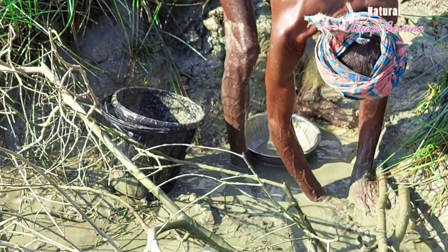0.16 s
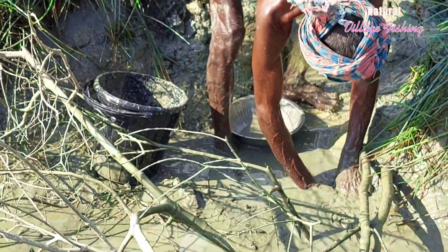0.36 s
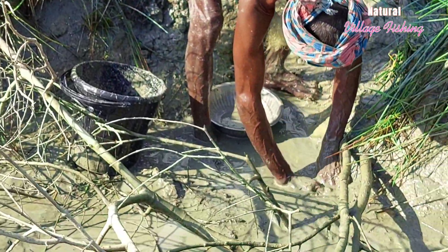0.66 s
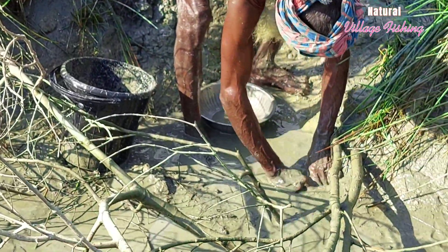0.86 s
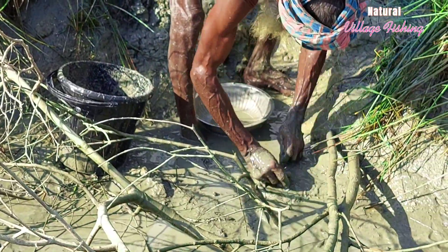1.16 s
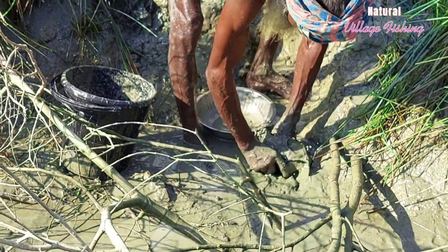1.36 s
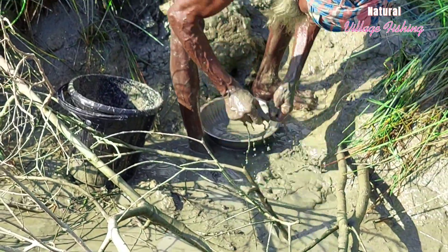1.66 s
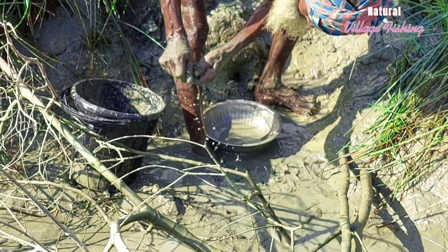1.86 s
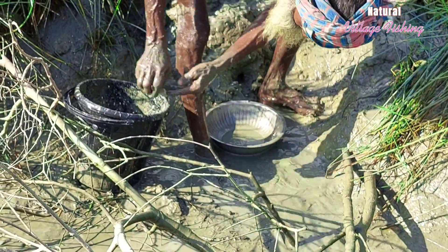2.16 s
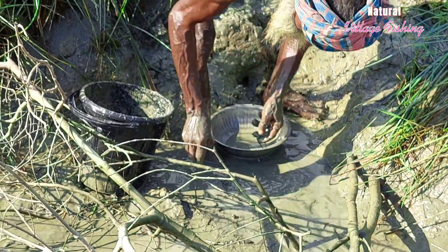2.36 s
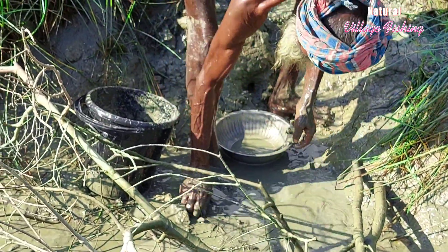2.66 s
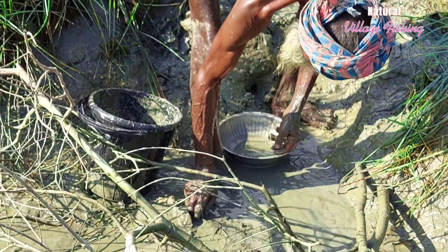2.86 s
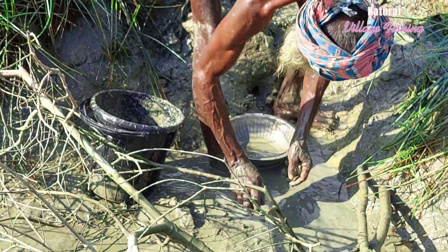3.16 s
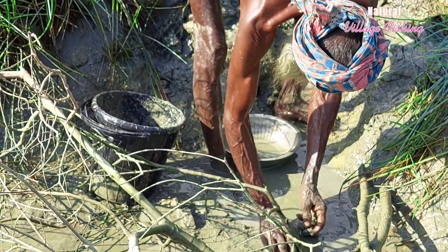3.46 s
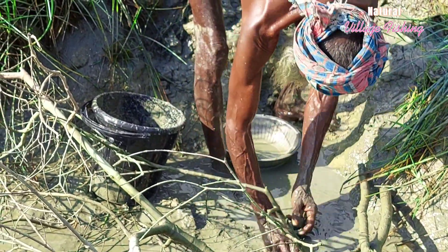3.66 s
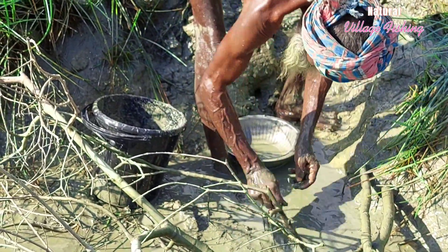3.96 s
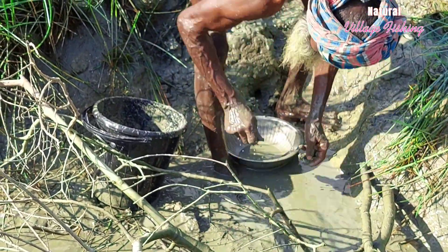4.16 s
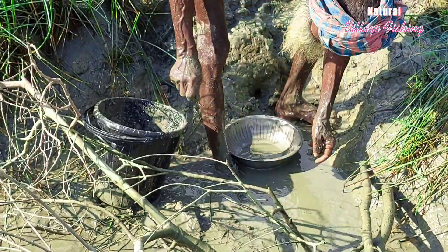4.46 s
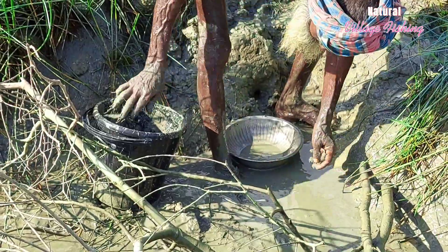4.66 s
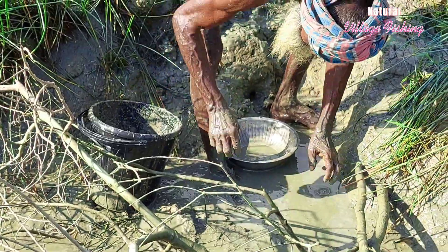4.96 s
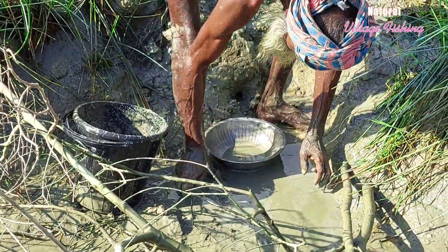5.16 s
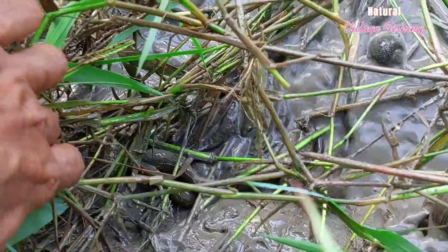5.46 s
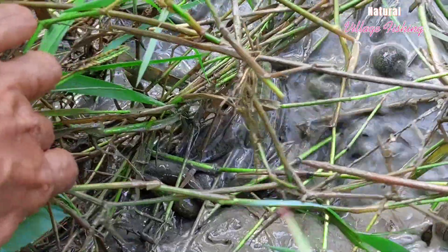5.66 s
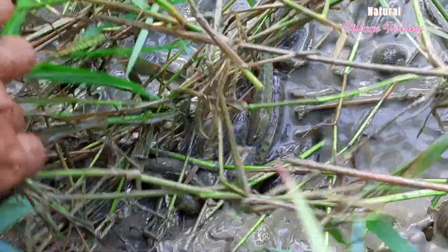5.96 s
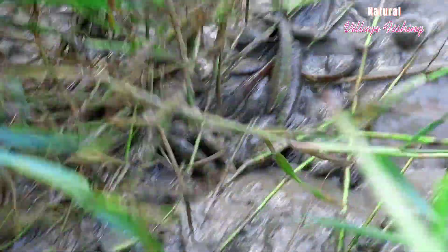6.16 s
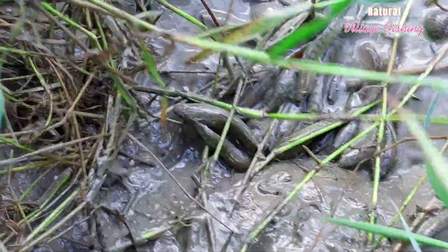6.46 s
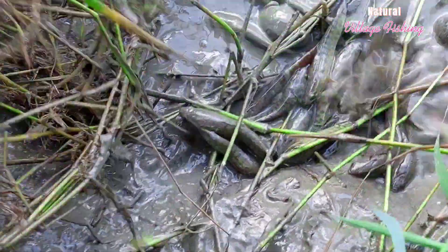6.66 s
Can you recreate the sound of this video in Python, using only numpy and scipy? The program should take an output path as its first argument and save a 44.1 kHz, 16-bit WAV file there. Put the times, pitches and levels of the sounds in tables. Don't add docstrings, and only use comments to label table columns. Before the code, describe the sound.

Outdoors in a muddy field, a one-cylinder pump engine chugs about sixteen beats a second with a rattling casing. Close by, hands squelch in mud, popping small bubbles, while dry stalks snap. A fly buzzes past, the microphone is knocked on its right side, and a small bird chirps. Near the end the scene cuts: the engine turns farther and duller, and grass rustles loudly as it is pushed aside.

```python
import sys
import numpy as np
from scipy import signal
from scipy.fft import rfft, irfft, next_fast_len
from scipy.io import wavfile
from scipy.ndimage import uniform_filter1d, map_coordinates

SR = 44100
rng = np.random.default_rng(int(sys.argv[2]) if len(sys.argv) > 2 else 0)


def natural_amplitude(level_db):
    exponent = np.asarray(level_db, float) / 20
    return 10 ** exponent


def dump_mix(stems):
    frames = np.atleast_2d(stems).T
    limited = np.clip(frames, -1, 1)
    pcm = np.round(limited * 32767).astype(np.int16)
    wavfile.write(sys.argv[1], SR, pcm)


N = 299439
T = np.arange(N) / SR
CHANGE_S = 5.7395
AFTER = T >= CHANGE_S
LEFT_DB, RIGHT_DB = 9, -5
ENGINE_SIDES = natural_amplitude([[-1.2], [1.2]])

# time_s, firings_counted
TURNS = [(0.0076, 0), (0.6559, 10), (1.301, 20), (1.9412, 30), (2.324, 36), (2.5781, 40), (2.8927, 45),
         (3.2717, 51), (3.8427, 60), (4.602, 72), (5.2306, 82), (5.7365, 90)]
# time_s, firings_counted
TURNS_AFTER = [(5.7882, 0), (6.7421, 15)]
# time_s, bark_db, bright_casing_db
IN_VIEW = [(0, .8, -2), (.7, .3, -2), (1.35, 1.2, .3), (2, .8, .3), (2.45, -.6, .3), (2.85, 1.5, -2),
           (3.25, .3, -3), (3.6, 2, -4), (4, 2, -11), (4.3, .3, -11), (4.9, -1, -8), (5.7, .3, -5)]
# start_s, length_s, level_db, large_pocket_share (0-1)
SPLASHES = [(0.089, 0.085, -55, .1), (1.342, 0.13, -43.5, .1), (1.415, .17, -45, .35),
            (1.55, 0.17, -47, .05), (2.151, 0.2, -53, .1), (2.79, .07, -58, .6), (5.075, .05, -45, .5),
            (6.055, .07, -50, .1), (6.225, 0.15, -49, .05), (6.36, .12, -52, .1), (6.46, 0.36, -56, .19)]
# frequency_hz, density_db_per_hz
RUSTLE = [(2650, -21), (4500, -2.5), (5420, -1.5), (5900, -9), (7530, -2.5), (8600, -4.5), (11100, 3),
          (13600, 2.5), (15000, 0), (16000, -7)]


def unit(x):
    return x / np.sqrt(np.mean(x ** 2) + 1e-20)


def curves(rows, t=T):
    s, *cols = np.transpose(rows)
    return [np.interp(t, s, c) for c in cols]


def wobble(rate):
    coarse = T[::16]
    knots = rng.standard_normal(int(N * rate / SR) + 4)
    return np.interp(T, coarse, map_coordinates(knots, [coarse * rate]))


def coloured(x, points):
    m = next_fast_len(x.shape[-1] + 8192)
    f, db = np.transpose(points)
    gain = natural_amplitude(np.interp(np.log(np.fft.rfftfreq(m, 1 / SR) + 1), np.log(f), db, -120, -120))
    return irfft(rfft(x, m) * gain, m)[..., :x.shape[-1]]


def noise(points, alike, grain_db=0, grain_rate=300):
    a, b = rng.standard_normal((2, N))
    turn = np.arccos(np.clip(alike, -1, 1)) / 2
    middle, side = np.cos(turn) * a, np.sin(turn) * b
    pair = np.array([middle + side, middle - side])
    return unit(coloured(pair * natural_amplitude(grain_db * wobble(grain_rate)), points))


def patchy(pair, patchy_db):
    z = signal.stft(pair, nperseg=256)[2]
    patches = uniform_filter1d(rng.standard_normal(z.shape[1:]), size=7, axis=0)
    patches = uniform_filter1d(patches, size=8, axis=1)
    return unit(signal.istft(z * natural_amplitude(patchy_db * unit(patches)), nperseg=256)[1][:, :N])


def humps(rows, skew):
    out = np.zeros(N)
    for s, length, db, *_ in rows:
        span = slice(round(s * SR), round((s + length) * SR))
        out[span] += natural_amplitude(db) * np.sin(np.pi * np.clip((T[span] - s) / length, 0, 1) ** skew)
    return out


def sided(pan_db):
    left = natural_amplitude(pan_db) / (1 + natural_amplitude(pan_db))
    return 2 * np.array([left, 1 - left]).reshape(2, -1)


def add(out, x, s, pan_db, lag=0):
    for side, shift, db in zip(out, (0, lag), (pan_db / 2, -pan_db / 2)):
        spot = side[max(round(s * SR) + shift, 0):][:x.shape[-1]]
        spot += natural_amplitude(db) * x[:len(spot)]


def counted(turns):
    s, count = np.transpose(turns)
    beyond_s = np.minimum(T - s[0], 0) + np.maximum(T - s[-1], 0)
    return np.interp(T, s, count) + beyond_s / .064


def firing_count():
    return np.where(AFTER, 100 + counted(TURNS_AFTER), counted(TURNS))


def chirps():
    # start_s, length_s, first_hz, last_hz, level_db
    calls = [
        (.585, .05, 4100, 3900, -54),
        (.595, .07, 2500, 2450, -50),
        (1.04, .08, 4200, 4500, -59),
        (2.465, .05, 3900, 4200, -57),
        (5.655, .085, 2650, 2400, -47),
        (5.735, .048, 4650, 4600, -52),
        (3.83, .05, 3950, 3600, -56),
        (4.855, .085, 2250, 2100, -56),
        (5.86, .16, 2750, 4500, -59),
    ]
    out = np.zeros((2, N))
    for s, length, first_hz, last_hz, db in calls:
        hz = np.linspace(first_hz, last_hz, round(length * SR))
        husk = 1 + 5.5 * uniform_filter1d(rng.standard_normal(len(hz)), size=70)
        tone = husk * np.sin(2 * np.pi * np.cumsum(hz) / SR)
        add(out, natural_amplitude(db - 1.5) * signal.windows.tukey(len(hz), .6) * tone, s, -6)
    return out


def bird():
    roll_s, roll_gap_s, roll_hz, roll_db = 4.856, .0172, (7600, 4100), -50
    arch_s, arch_gap_s, low_hz, high_hz, arch_db = 4.975, .038, 2500, 3800, -42
    out = np.zeros((2, N))
    slur, u = np.linspace(*roll_hz, 230), np.linspace(0, 1, 1500)
    arch = low_hz + (high_hz - low_hz) * np.sin(np.pi * u ** .7)
    arch_shape = (arch / high_hz) ** 9 * u ** .7
    notes = [(roll_s + k * roll_gap_s, slur, roll_db, np.hanning(len(slur)), LEFT_DB) for k in range(5)]
    notes += [(arch_s + k * arch_gap_s, arch, arch_db - k, arch_shape, -2) for k in range(3)]
    for s, hz, db, shape, pan_db in notes:
        turns = 2 * np.pi * np.cumsum(hz) / SR
        husk = 1 + .9 * uniform_filter1d(rng.standard_normal(len(hz)), size=12)
        add(out, natural_amplitude(db) * shape * husk * (np.sin(turns) + .1 * np.sin(2 * turns)), s, pan_db)
    return out


def fly():
    # time_s, band_hz, level_db
    passes = [
        [(3.26, 4650, -64), (3.3, 4550, -62), (3.345, 4750, -60)],
        [(3.37, 4250, -57), (3.41, 4800, -54), (3.435, 5600, -59), (3.475, 5850, -60), (3.54, 5550, -64),
         (3.6, 4900, -69), (3.65, 4400, -56), (3.705, 4550, -58)],
        [(3.57, 3370, -63), (3.69, 4000, -62)],
        [(3.87, 1850, -57), (3.925, 2200, -50), (3.97, 2400, -55)],
        [(4.085, 2450, -54), (4.14, 2500, -51), (4.19, 2550, -53), (4.225, 3200, -52), (4.27, 3500, -50),
         (4.33, 3600, -49), (4.41, 3500, -52), (4.48, 3700, -50), (4.57, 3750, -49)],
        [(4.42, 4050, -55), (4.46, 4350, -50), (4.57, 4650, -47)],
        [(4.37, 5750, -65), (4.43, 6650, -63), (4.5, 7300, -63), (4.57, 7600, -64)],
        [(4.39, 7500, -66), (4.48, 8200, -65), (4.57, 8500, -66)],
        [(4.385, 11300, -61), (4.46, 11700, -57), (4.57, 12200, -57)],
        [(4.72, 3300, -62), (4.82, 3650, -58), (4.97, 3550, -58)],
        [(5.18, 3800, -55), (5.38, 4400, -52)],
        [(5.41, 3700, -54), (5.46, 3950, -48), (5.52, 4480, -42.5), (5.59, 4650, -49), (5.62, 4100, -58),
         (5.68, 3900, -61)],
        [(5.51, 4600, -50), (5.56, 5200, -50), (5.6, 4900, -57)],
    ]
    # time_s, left_right_db, wing_beat_hz, air_share
    place = [(3.3, 5, 168, 1.3), (3.5, 17, 170, 1.3), (3.68, 0, 172, 1.5), (3.9, -8, 178, 1.8),
             (4.17, 2, 172, 1.6), (4.25, 8, 166, .5), (4.37, 6, 166, .5), (4.47, -1, 182, .8),
             (4.6, 1, 182, .8), (4.8, 5, 163, 1.2), (5.5, -8, 163, 1.2)]
    out = np.zeros((2, N))
    pan_db, beat_hz, airy = curves(place)
    rate = beat_hz * (1 + 0.008 * wobble(6))
    beats = np.cumsum(rate * (1 + 0.012 * wobble(90))) / SR
    flit_db = 2.4 * wobble(28)
    for rows in passes:
        span = slice(round(rows[0][0] * SR), round(rows[-1][0] * SR))
        hz, db = curves(rows, T[span])
        since = beats[span] % 1 / rate[span]
        stroke = since / .0012 * np.exp(-since / .0012)
        tone = 0
        for ratio, gain_db in [(1, 0), (1.68, -22), (1.95, -23)]:
            loss_db = np.maximum(ratio * hz - 6900, 0) / 90 * (ratio > 1)
            tone = tone + natural_amplitude(gain_db - loss_db) * np.sin(2 * np.pi * ratio * hz * since)
        narrow, wide = [unit(uniform_filter1d(rng.standard_normal(len(hz)), size=size)) for size in (110, 26)]
        air = (narrow + .7 * wide) * np.sin(2 * np.pi * np.cumsum(hz) / SR)
        buzz = unit(unit(stroke * tone) + airy[span] * air)
        add(out, natural_amplitude(db + flit_db[span]) * signal.windows.tukey(len(hz), .2) * buzz, rows[0][0], 0)
    return out * sided(pan_db)


def knocks():
    # start_s, peak_db, low_ring_db, left_loss_db
    bumps = [
        (2.819, -30.5, 9, 13.5),
        (4.056, -12, 3.5, 15),
        (5.0657, -24.5, -20, 12.5),
        (5.0755, -27, -12, 9.5),
        (5.0865, -35, -13, 18),
        (5.132, -38, -13, 12),
        (5.698, -40, 9, 14.5),
    ]
    # start_s, peak_db, low_ring_db, left_loss_db
    rebounds = [(4.0617, -19, -10, 15)]
    # frequency_hz, level_db, t60_s
    modes = [(85.3, -8.5, 0.07), (157.2, -9.5, .07), (320.6, 3, 0.022), (513, -1, 0.013), (740, -4, .01),
             (980, -7, 0.009), (1400, -12, .005), (2700, -7, 0.004)]
    hard_s, soft_s = .00013, .0012
    out, t = np.zeros((2, N)), np.arange(SR // 5) / SR
    contacts = [(*row, hard_s) for row in bumps] + [(*row, soft_s) for row in rebounds]
    for s, db, low_db, loss_db, build_s in contacts:
        ring = 0
        for hz, level, t60 in modes:
            decay = natural_amplitude(level + low_db * (hz < 300) - 60 * t / t60)
            ring = ring + np.sign(300 - hz) * decay * np.sin(2 * np.pi * hz * t)
        add(out, natural_amplitude(db) * (1 - np.exp(-t / build_s)) * ring, s + 0.00038, -2 * loss_db)
    return out * natural_amplitude(-3)


def field():
    # frequency_hz, density_db_per_hz
    slosh_bands = [(450, -36), (750, 2), (1000, -2), (1300, -1), (1800, -8), (2500, -68)]
    stir_bands = [(1200, -38), (1700, -3), (2250, 0), (3000, -6.5), (4400, -5.5), (5500, -16), (8000, -33)]
    # time_s, effort_db
    effort_rows = [(0, -55), (.4, -68), (.83, -66.5), (1.25, -63.5), (1.4, -55), (1.68, -57.5), (2.15, -60),
                   (2.42, -68.5), (2.72, -65), (2.87, -74), (3.54, -75), (4.25, -72), (4.58, -63),
                   (4.85, -66), (5.31, -58), (6.05, -58.5), (6.54, -40.5), (6.79, -39)]
    # start_s, length_s, level_db
    swishes = [(0.69, 0.11, -52.5), (0.903, 0.1, -67), (1.354, 0.08, -56), (1.837, 0.044, -49),
               (1.928, 0.12, -49), (2.233, .1, -54), (3.138, 0.05, -63), (3.2, 0.07, -59),
               (4.36, 0.25, -60), (5.09, .09, -46), (5.269, 0.085, -47), (5.408, 0.074, -48),
               (6.05, 0.045, -55)]
    # start_s, length_s, level_db
    trickle = [(1.5, 4.2, -68)]
    effort, splash = natural_amplitude(curves(effort_rows)[0]), humps(SPLASHES, skew=.8)
    large_splash = humps([row for row in SPLASHES if row[-1] > .2], skew=.8)

    water = natural_amplitude(np.where(AFTER, -77, -65.5)) + natural_amplitude(-10) * large_splash + natural_amplitude(-21.5) * effort
    water = water + humps(trickle, skew=1.1)
    mud = natural_amplitude(np.where(AFTER, -68, -63.5)) + natural_amplitude(-7) * splash + natural_amplitude(-9) * effort
    slosh = water * natural_amplitude(4.5 + 3.3 * wobble(11)) * noise(slosh_bands, alike=0.039, grain_db=1.5, grain_rate=60)
    stirred = patchy(noise(stir_bands, alike=0.021, grain_db=2.2, grain_rate=130), patchy_db=2.5)
    stir = mud * natural_amplitude(4 + 2.1 * wobble(14)) * stirred

    strokes = humps(swishes, skew=1.04) * natural_amplitude(3 * wobble(70))
    brushed = effort * natural_amplitude(np.where(AFTER, .8, 2.2) * wobble(22)) + .8 * strokes
    blades = noise(RUSTLE, alike=0.059, grain_db=np.where(AFTER, 1.2, 2.8), grain_rate=200)
    rustle = natural_amplitude(5) * brushed * patchy(blades, patchy_db=2.5)
    wet_bands = [(1500, -35), (2200, 3), (4500, 4), (6000, -4), (7500, -40)]
    wet = natural_amplitude(4) * strokes * noise(wet_bands, alike=.05, grain_db=3.5, grain_rate=120)
    on_left = (T > 2.9) & (T < 5.04)
    return slosh + (stir + wet) * sided(RIGHT_DB) + rustle * sided(np.where(on_left, LEFT_DB, RIGHT_DB))


def bubbles():
    small_hz, large_hz, spread, life_cycles = 2150, 1000, 1.75, 2.1
    out, t = np.zeros((2, N)), np.arange(SR // 80) / SR
    for s, length, db, large in SPLASHES:
        for when, kind, pitch, size, side in rng.random((90, 5)):
            hz = (small_hz if kind > large else large_hz) * spread ** (pitch - .5)
            ring = np.sin(2 * np.pi * hz * (t + 4 * t * t)) * t * hz * np.exp(-t * hz / life_cycles)
            pan_db, lag = -6 + 8 * (side - .5), round(30 * side) - 8
            add(out, natural_amplitude(db + 3.5 - 13 * size) * ring, s + when * length, pan_db, lag=lag)
    return out


def pops():
    # start_s, peak_db, pitch_hz, left_right_db
    pockets = [(0.107, -30.5, 2220, -12), (0.126, -25, 1296, -11), (0.127, -34, 1950, -11),
               (0.155, -37.5, 2230, -23), (0.204, -27, 3620, -7), (0.482, -42.5, 2320, -19),
               (1.344, -31, 3720, -11), (1.471, -30.5, 985, 2), (1.485, -32, 2170, -17.5),
               (1.512, -31, 2130, -17), (1.552, -34, 1090, -5), (1.623, -29, 2190, -9.5),
               (1.776, -40, 780, 2), (1.784, -44, 4150, -13), (2.276, -26, 2386, -5),
               (3.153, -27.5, 2745, -4), (3.765, -36, 4250, -14), (3.977, -45.5, 2540, -27),
               (4.566, -21, 2383, -3.5), (4.914, -31, 900, 0), (4.914, -39, 1450, 0),
               (4.915, -41, 2200, -4), (4.963, -36, 2080, -19), (5.099, -30, 4240, -13),
               (5.159, -31, 4360, -4), (5.283, -33, 3840, -12), (5.315, -34, 3790, -8),
               (6.061, -29, 2354, -4.5), (6.256, -37, 2300, -9.5), (6.38, -38, 2540, -18.5),
               (6.485, -30, 2084, -19), (6.649, -33, 1900, -9), (6.73, -33.5, 1004, 1)]
    # start_s, peak_db, pitch_hz
    gurgles = [(.036, -41, 4600), (.056, -42, 3500), (.066, -40, 1250), (.136, -39, 3500),
               (.275, -44, 2300), (1.358, -38, 3000), (1.374, -34, 2270), (1.383, -39, 1100),
               (1.394, -36, 2350), (1.404, -38, 1200), (1.421, -32, 2300), (1.437, -34, 1050),
               (1.443, -37, 2150), (1.454, -38, 1050), (1.514, -35, 1000), (1.524, -36, 850),
               (1.532, -38, 1250), (1.552, -38, 4000), (1.566, -39, 1150), (1.652, -37, 2100),
               (1.666, -36, 3100), (1.672, -37, 2200), (1.728, -43, 1230), (1.788, -41, 1200),
               (1.811, -41, 1680), (2.62, -47, 5300), (2.7, -45, 3700), (3.145, -39, 2100),
               (3.335, -50, 4800), (3.71, -46, 1550), (3.832, -47, 4000), (4.666, -39, 3040),
               (4.709, -46, 4750), (4.831, -43, 900), (4.958, -44, 3600), (4.966, -41, 4250),
               (4.967, -41, 3050), (4.979, -44, 1250), (5.11, -40, 2300), (5.606, -42, 2160),
               (5.724, -39, 3400), (5.73, -39, 1850), (5.775, -46, 5200), (5.81, -48, 5000),
               (5.835, -45, 2850), (5.851, -46, 1750), (5.862, -46, 2000), (5.953, -48, 2100),
               (5.962, -46, 4150), (5.998, -48, 2370), (6.03, -45, 650), (6.056, -44, 1250),
               (6.075, -43, 1750), (6.092, -45, 2400), (6.171, -45, 2480), (6.256, -42, 3650),
               (6.275, -42, 1400), (6.284, -41, 2310), (6.31, -39, 3100), (6.325, -43, 1750),
               (6.422, -43, 2210), (6.447, -41, 2340), (6.745, -42, 900), (6.777, -37, 2600)]
    t60_s, quick_hz = .029, 2500
    out, t = np.zeros((2, N)), np.arange(SR // 20) / SR
    for s, db, hz, pan_db in pockets + [(*row, -6) for row in gurgles]:
        spray = uniform_filter1d(uniform_filter1d(rng.standard_normal(len(t)), size=24), size=14)
        ring = np.sin(2 * np.pi * hz * (t + 3 * t * t)) * (1 + 2.4 * spray)
        decay = natural_amplitude(db + 4.5 - 60 * t / t60_s * max(hz / quick_hz, 1) ** 1.4)
        add(out, decay * (1 - np.exp(-t * hz / .7)) * ring, s, pan_db, lag=9)
    return out


def snaps():
    # start_s, peak_db
    stalks = [(0.702, -28), (1.1812, -43.5), (1.5, -32), (1.6105, -21), (1.63, -12), (1.637, -34),
              (1.648, -36), (1.66, -38), (1.8355, -24), (1.8415, -12), (1.864, -35), (2.2095, -34),
              (2.3888, -26), (2.41, -33), (2.66, -46), (2.733, -42), (5.1342, -22), (5.1598, -14.5),
              (5.284, -24), (5.299, -28), (5.316, -27), (5.331, -26), (5.3921, -38), (5.4306, -30),
              (5.436, -15), (5.5118, -29)]
    # start_s, peak_db, body_db
    twigs = [(0.2034, -29, 11.5), (0.6876, -42, 1), (1.235, -37, 2), (1.2515, -36, -1), (1.3275, -36, -7),
             (1.3443, -32, 12), (1.4805, -38, -6), (1.5913, -36, -4), (1.7974, -41, 0), (1.842, -30, 4),
             (1.9589, -30, 0), (2.2448, -38, -5), (2.046, -40, 0), (2.132, -41, 2), (2.2573, -32, 5),
             (2.2787, -37, 5), (2.307, -36, -3), (2.8127, -44, 9), (5.0983, -34, 9), (5.16, -28, 4),
             (5.1921, -33.5, -4), (5.286, -34, 6), (5.336, -31, 5), (5.438, -31, 5), (5.2594, -42, -6),
             (6.0596, -24, -7), (6.483, -31, 4)]
    # start_s, peak_db, body_db
    brush = [(0.1055, -36.5, 0), (3.0339, -50, -10), (3.1512, -46.5, -3), (3.2121, -46, -8),
             (3.761, -49, -3), (4.026, -46, -7), (4.0553, -32, 9), (4.3633, -43, -8), (4.499, -42, -14),
             (4.523, -41, -14), (4.543, -40, -14), (4.609, -45, -14), (4.65, -44, -8), (4.666, -40, 0),
             (4.709, -44, -6), (4.5657, -21.5, -6), (4.6365, -45, 2), (4.6962, -44, 0), (4.739, -40, -12),
             (4.786, -41, -14)]
    edge, body, t = np.zeros((2, N)), np.zeros((2, N)), np.arange(SR // 10) / SR
    rows = [(s, db, -21, -8) for s, db in stalks]
    rows += [(*row, -7) for row in twigs]
    rows += [(*row, 10) for row in brush]
    for s, db, body_db, pan_db in rows:
        t60_s = .026 - .0004 * (db + 35)
        burst = natural_amplitude(db - 60 * t / max(t60_s, .003)) * (1 - np.exp(-t / 0.0014)) * rng.standard_normal(len(t))
        spurts = np.repeat(rng.standard_normal(len(t) // 30 + 1), 30)[:len(t)]
        burst *= natural_amplitude(3.6 * spurts)
        lag = round(-pan_db * rng.uniform(-1, 3.5))
        add(edge, burst, s, pan_db, lag=lag)
        add(body, natural_amplitude(body_db) * burst, s, pan_db, lag=lag)
    edge_bands = [(hz, 0.89 * db - 5 * (hz < 8000)) for hz, db in RUSTLE]
    bright = coloured(patchy(edge, patchy_db=2.2) * np.sqrt(np.mean(edge ** 2)), edge_bands)
    dull = coloured(body, [(900, -37), (1900, 2), (4800, -1), (6000, -5), (7500, -40)])
    return natural_amplitude(3) * bright + natural_amplitude(2.5) * dull


def hum():
    # multiple, level_db
    frame_lines = [(6, -49.5), (7, -53)]
    # frequency_hz, level_db
    impeller = [(53.3, -49), (66.5, -51)]
    count = firing_count()
    frame = sum(natural_amplitude(db + 2.2 * wobble(2.5)) * np.sin(2 * np.pi * k * count) for k, db in frame_lines)
    wheel = sum(natural_amplitude(db + 1.2 * wobble(3)) * np.sin(2 * np.pi * hz * T + .4 * wobble(3)) for hz, db in impeller)
    return (frame + wheel) * ENGINE_SIDES


def clatter():
    panel_hz = (790, 1240, 1780, 2150)
    out, t = np.zeros((2, N)), np.arange(SR // 40) / SR
    s, count = np.transpose(TURNS)
    for firing_s in np.interp(np.arange(count[-1]), count, s):
        bright_db = curves(IN_VIEW, firing_s)[1]
        for panel, pitch, late, size, side in rng.random((4, 5)):
            hz = panel_hz[int(4 * panel)] * (1 + .16 * (pitch - .5))
            ring = natural_amplitude(-60 * t / .024) * (1 - np.exp(-t / .0009)) * np.sin(2 * np.pi * hz * t)
            db = -40 - 16 * size + (panel > .5) * bright_db
            add(out, natural_amplitude(db) * ring, firing_s + .04 * late ** 2, 9 * (side - .6), lag=round(40 * side) - 20)
    return out


def engine_bark(since, firing, bared_db):
    # delay_s, pitch_hz, spread_s, phase_rad, level_db, level_after_change_db
    paths = [
        (.0006, 230, 0.004, -0.56, -21.7, -26.5),
        (.0082, 135, 0.0045, -1.5, -28.5, -29),
        (.0145, 130, .0028, 1.6, -33, -34.5),
        (.0198, 129, 0.004, -1.6, -33.5, -31.5),
    ]
    bark, near = np.zeros((2, N)), since < .034
    since, firing, after, bared_db, t = since[near], firing[near], AFTER[near], bared_db[near], T[near]
    for path, (delay, hz, spread, phase, db, later_db) in enumerate(paths):
        size, late = rng.standard_normal((2, 130))[:, firing] * (1 + 0.56 * (path > 0))
        u = since - delay - 0.00017 * late + np.array([[-.00012], [.00012]])
        level_db = np.where(after, later_db + 4 * (t - 6.2), db + bared_db)
        gain = natural_amplitude(level_db + np.where(after, 2.2, 1.1) * size)
        pulse = np.exp(-(u / (spread * np.where(u < 0, .7, 1))) ** 2)
        bark[:, near] += gain * pulse * np.sin(2 * np.pi * hz * np.where(after, .85, 1) * u + phase)
    return bark


def engine():
    # frequency_hz, density_db_per_hz
    rumble_bands = [(30, -51), (52, -9), (90, .5), (130, -1.5), (170, -5.5), (250, -120)]
    rasp_bands = [(70, -120), (120, -8), (150, 0), (240, -2), (330, -8), (410, -13), (480, -53)]
    haze_bands = [(250, -27), (330, 2.5), (480, -1.5), (560, -5), (640, -2.5), (720, -16.5), (900, -43)]
    # frequency_hz, density_db_per_hz
    low_bands = [(600, -40), (900, -8), (1200, 0), (1450, -6), (1800, -30)]
    thin_bands = [(1300, -30), (1650, -4), (1900, 2), (2300, 0), (3000, -14), (5500, -30)]
    # level_db at the first spot, then just after the change
    first_db = [-43, -42.5, -60.5]
    changed_db = [-46.5, -54.5, -58]
    growth = [8.6, 11.5, 7]
    lead = .3
    count = firing_count() + lead
    firing = np.floor(count).astype(int)
    since = (count - firing - lead) * .0636
    bared_db, bright_db = curves(IN_VIEW)

    def swell(delay, spread):
        return np.exp(-((since - delay) / spread) ** 2)

    rumble_db, rasp_db, haze_db = [np.where(AFTER, later + grows * (T - CHANGE_S), db)
                                   for db, later, grows in zip(first_db, changed_db, growth)]
    rumble_db = rumble_db + 1.6 * wobble(11) + 1.1 * swell(0.016, .02)
    rasp_db = rasp_db - 3 + 1.7 * wobble(25) + 3.1 * swell(0.0089, 0.0082)
    haze_db = haze_db + 2.4 * wobble(20) + 6.3 * swell(0.011, 0.015)
    rumble = natural_amplitude(rumble_db) * noise(rumble_bands, alike=0.88)
    rasp = natural_amplitude(rasp_db) * noise(rasp_bands, alike=.55)
    haze = natural_amplitude(haze_db) * noise(haze_bands, alike=0.19)

    tick_db = np.where(AFTER, -63, -45) + 1.7 * rng.standard_normal((2, 130))[:, firing]
    low = natural_amplitude(tick_db[0] - 4.5) * noise(low_bands, alike=.1, grain_db=1.8, grain_rate=150)
    thin = natural_amplitude(tick_db[1] + bright_db) * noise(thin_bands, alike=.1, grain_db=1.8, grain_rate=150)
    tick = (swell(.0005, .0025) + .3 * swell(.008, .008)) * (low + thin)
    return (engine_bark(since, firing, bared_db) + rumble + rasp) * ENGINE_SIDES + tick + haze


def scene():
    far = chirps() + bird() + fly()
    hands = knocks() + field() + bubbles() + pops() + snaps()
    return far + hands + hum() + clatter() + engine()


def roll_off(x):
    return signal.sosfilt(signal.butter(12, 16510, fs=SR, output="sos"), x)


def record(dry):
    heard = coloured(dry, [(15, -24), (36, -8), (46, -7), (53, -1.5), (15300, -1.5), (15900, -24), (16700, -30)])
    heard = heard / (1 + np.abs(heard / .84) ** 8) ** (1 / 8)
    return roll_off(heard)


dry = scene()
out = record(dry)
dump_mix(out)
```